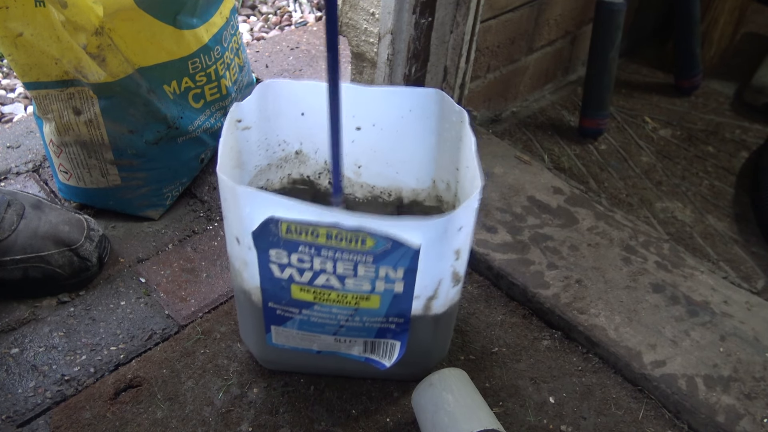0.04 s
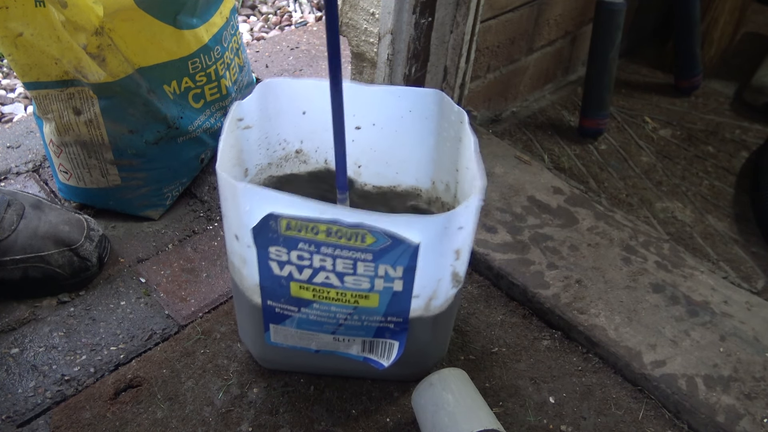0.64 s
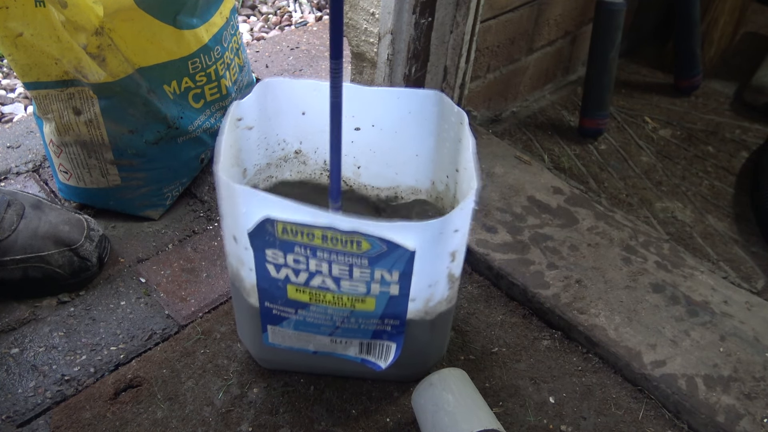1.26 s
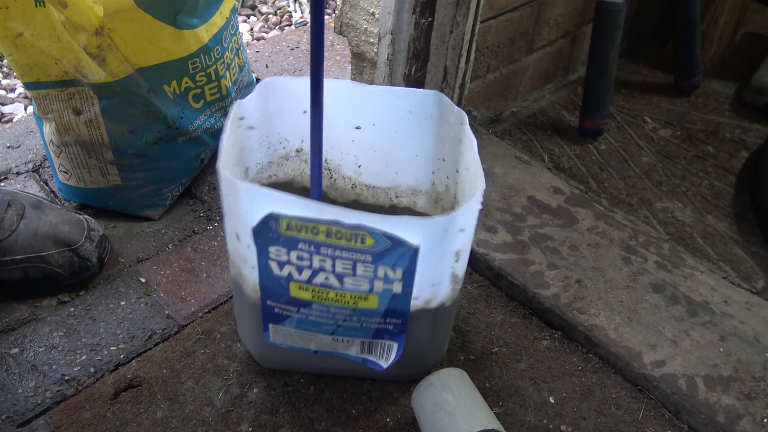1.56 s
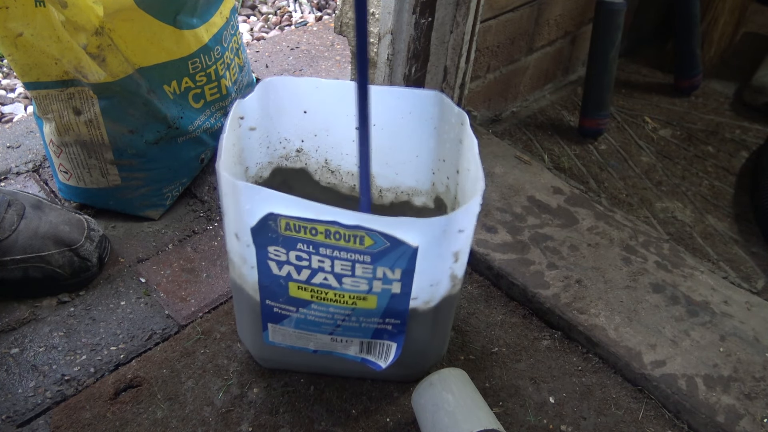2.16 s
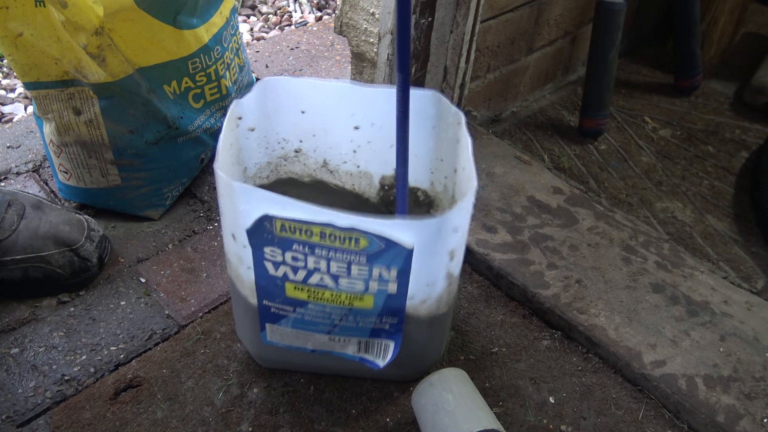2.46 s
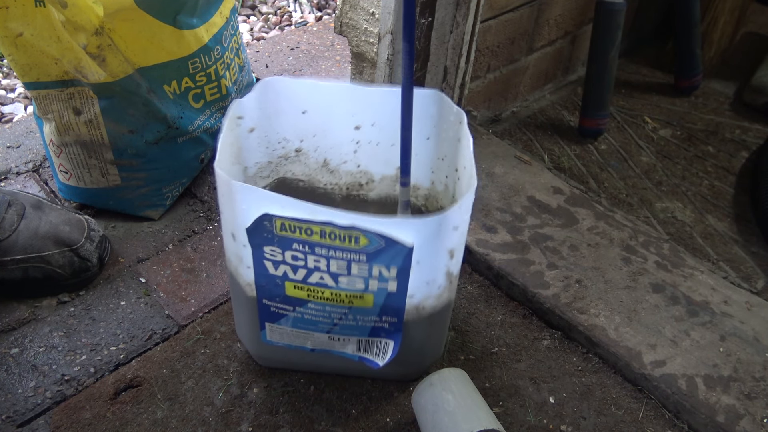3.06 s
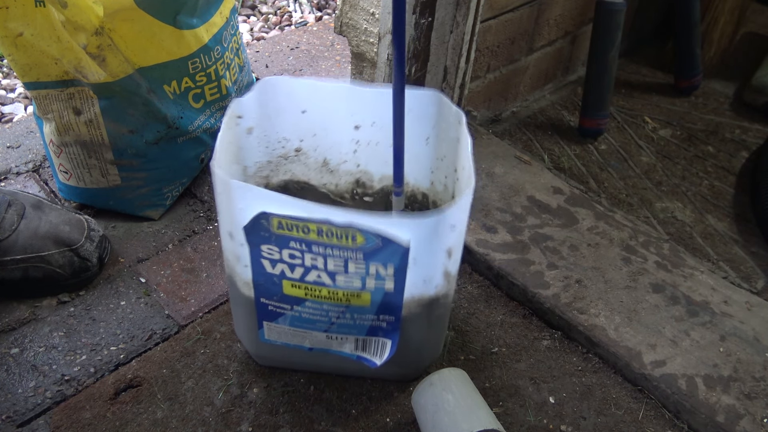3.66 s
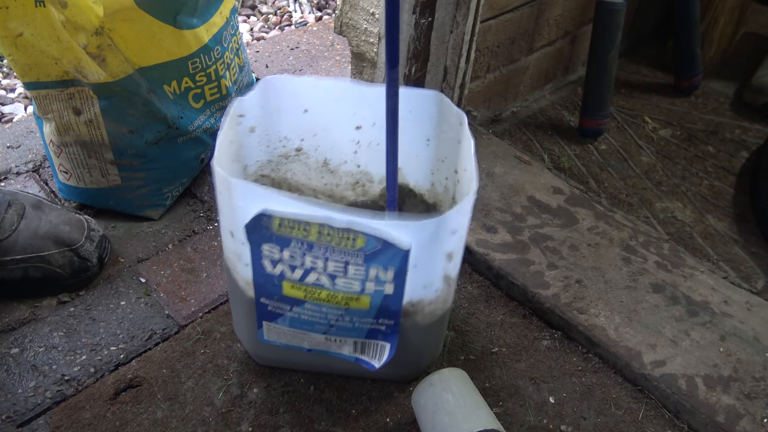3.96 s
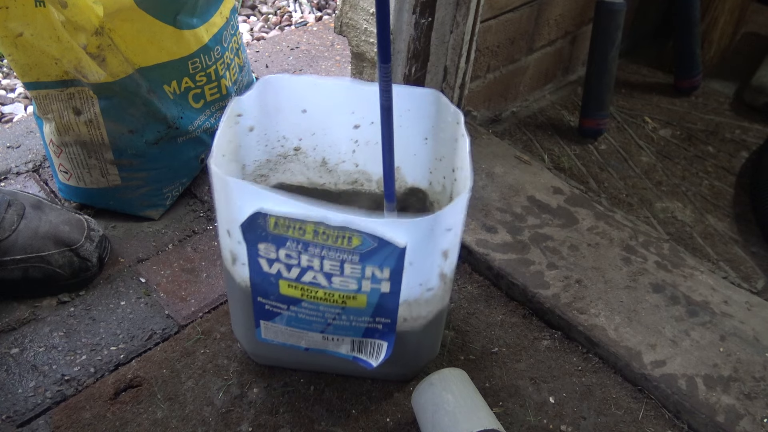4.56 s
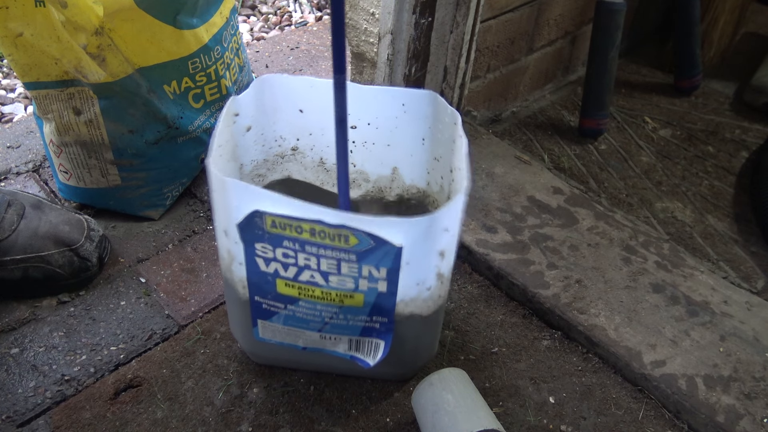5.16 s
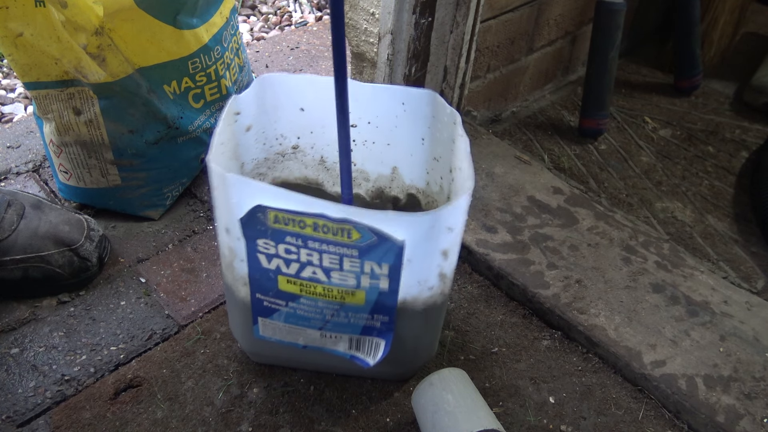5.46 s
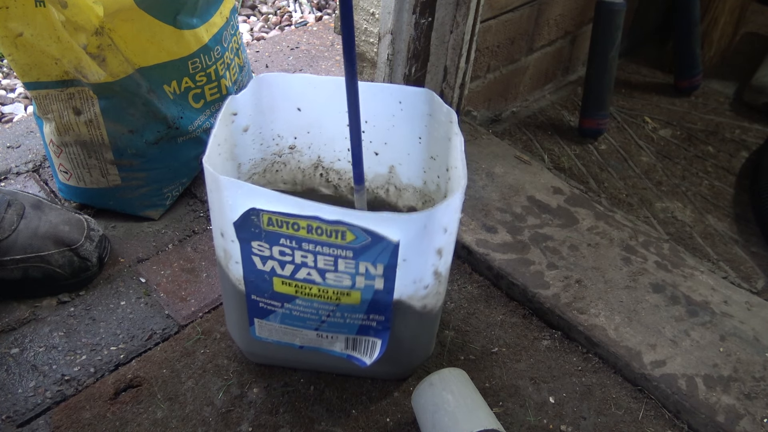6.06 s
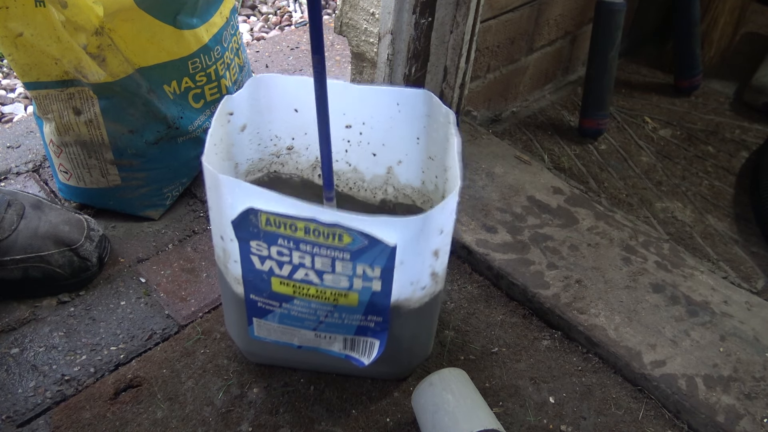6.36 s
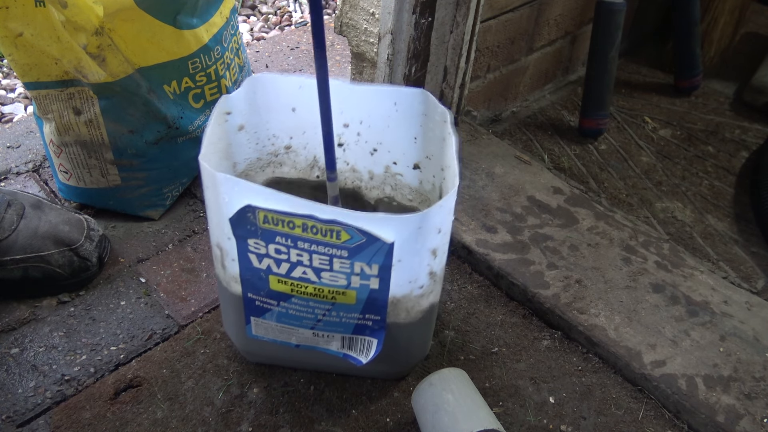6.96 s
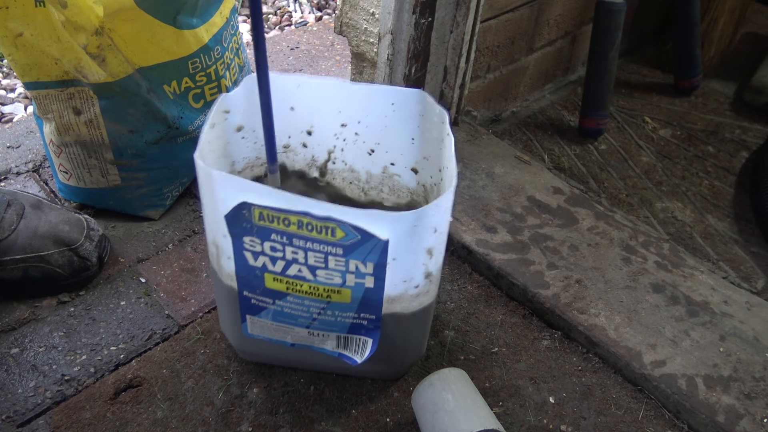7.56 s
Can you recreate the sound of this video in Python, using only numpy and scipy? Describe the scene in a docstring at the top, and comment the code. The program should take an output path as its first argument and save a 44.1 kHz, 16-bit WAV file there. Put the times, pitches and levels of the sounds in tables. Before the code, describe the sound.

An electric drill runs close by for the whole eight seconds or so, with a high, nearly constant motor and gear whine over the hiss of its fan. Its paddle churns wet cement in a plastic tub, making a rapid, hollow gurgle with grinding sand. In the first 1.5 seconds the mix splashes, fizzes and slaps, and the paddle scrapes and knocks on the plastic, most clearly near 0.4 and 1 second. More scrapes and knocks come around 2.9 seconds and from 3.7 to 4 seconds, among wet plops. From 4 to 6 seconds the churning is softer, with light grazes and small gritty crunches. The gear whine weakens and flutters after about 6 seconds, while lumps slap more strongly around 6.4 to 6.9 and again near 7.3 seconds. The drill is still running at the end. There is very little echo.

```python
"""A whining electric drill churns wet cement with a paddle, in a plastic tub in a doorway.
Motor tones and gear whine ride on the rush of the cooling fan. The blades pass about 22 times a second,
tearing open air pockets that ring the tub's hollow near 530 Hz. Sand grinds along the walls, lumps slap,
water splashes, and the paddle scrapes and knocks on the plastic."""
import sys
import numpy as np
from scipy import signal
from scipy.fft import rfft, irfft
from scipy.io import wavfile
from scipy.ndimage import uniform_filter1d

SR = 44100
rng = np.random.default_rng(int(sys.argv[2]) if len(sys.argv) > 2 else 0)


def pcm_store(signal):
    """Save signal as 16-bit PCM."""
    levels = np.round(np.clip(np.atleast_2d(signal), -1, 1) * 32767)
    wavfile.write(sys.argv[1], SR, levels.astype(np.int16).T)


N = 344862
T = np.arange(N) / SR
BINS_HZ = np.maximum(np.fft.rfftfreq(N, 1 / SR), 1)
MIC_LAG_MS = 0.04

# biggest lumps thrown: t/s, level/dB, air pocket f/Hz
BIG_LUMPS = [(.13, -15, 504), (.217, -14.5, 570), (.423, -9.5, 533), (.631, -13, 648), (.721, -15, 625),
             (.776, -13, 655), (.799, -7.5, 597), (1.276, -11.5, 652), (1.314, -12.5, 550),
             (1.374, -14, 484), (1.43, -13, 607), (1.654, -15.5, 495), (1.838, -13.5, 568),
             (1.932, -15, 626), (1.979, -13, 543), (2.117, -14.5, 553), (2.296, -19, 586),
             (2.466, -18.5, 530), (2.514, -14.5, 532), (2.625, -15.5, 595), (2.65, -15, 514),
             (2.74, -17.5, 513), (2.968, -13.5, 465), (3.019, -16, 495), (3.063, -19, 540),
             (3.282, -19, 511), (3.327, -14.5, 524), (3.365, -13.5, 524), (3.469, -12, 563),
             (3.541, -15, 560), (3.577, -14, 570), (3.618, -13.5, 586), (3.655, -10, 608),
             (3.711, -12.5, 562), (3.761, -10, 510), (3.795, -14.5, 495), (3.882, -14, 557),
             (3.899, -9.5, 530), (3.937, -11, 473), (4.069, -18.5, 550), (4.1, -15, 543), (4.135, -21, 540),
             (4.227, -19, 530), (4.311, -22, 545), (4.536, -20, 533), (4.911, -20.5, 533),
             (5.087, -18, 595), (5.179, -17, 517), (5.228, -13.5, 554), (5.273, -19.5, 552),
             (5.409, -17.5, 536), (5.548, -20, 516), (5.846, -14, 538), (5.892, -16, 570),
             (6.082, -19, 550), (6.35, -8, 560), (6.37, -14, 523), (6.447, -16.5, 632), (6.5, -16, 624),
             (6.54, -11.5, 510), (6.632, -12.5, 529), (6.649, -11, 585), (6.674, -12.5, 525),
             (6.72, -11.5, 557), (6.738, -16.5, 560), (6.813, -14.5, 495), (6.833, -20, 587),
             (6.88, -17.5, 525), (7.05, -22.5, 538), (7.226, -17, 518), (7.29, -12.5, 497), (7.32, -9, 517),
             (7.364, -14, 524), (7.534, -14.5, 564), (7.633, -12.5, 551), (7.676, -14, 586)]
# balance of the gear whine: t/s, left minus right/dB
WHINE_BALANCE = [(0, 0), (1.1, 0.5), (1.4, -2), (1.75, -0.5), (3.33, -6.5), (4.22, -3.5), (5.2, -1),
                 (6, -0.5), (6.5, 2), (7.27, 0.5), (7.82, 4)]


def from_db(db):
    """Decibels to gain."""
    return 10 ** (np.asarray(db) / 20)


def rms_one(x):
    """Scale to rms 1."""
    return x / np.sqrt(np.mean(x ** 2) + 1e-20)


def in_time(rows):
    """Rows (t/s, value) to one value per sample."""
    return np.interp(T, *np.transpose(rows))


def over_bins(rows):
    """Rows (f/Hz, value) to one value per FFT bin."""
    hz, value = np.transpose(rows)
    return np.interp(np.log(BINS_HZ), np.log(hz), value)


def swells(rows, roundness=0.48):
    """Rows (centre/s, length/s, level/dB) to a gain of rounded half-sine arches."""
    gain = np.zeros(N)
    for s, length, db in rows:
        arch = np.cos(np.pi * np.clip((T - s) / length, -1, 1))
        gain += from_db(db) * np.clip(arch, 0, 1) ** roundness
    return gain


def drift(rate_hz):
    """Slow random wander, rms 1."""
    hop = 40
    r = np.exp(-2 * np.pi * hop * rate_hz / SR)
    slow = signal.lfilter([1], [1, -2 * r, r * r], rng.standard_normal(N // hop + 2002))[2000:]
    return np.interp(np.arange(N) / hop, np.arange(len(slow)), rms_one(slow))


def resonate(x, hz, width_hz):
    """One resonance, peak gain 1."""
    r = np.exp(-np.pi * width_hz / SR)
    poles = [1, -2 * r * np.cos(2 * np.pi * hz / SR), r * r]
    return signal.lfilter(np.array([1, 0, -1]) * (1 - r * r) / 2, poles, x + 1e-18)


def band(x, low_hz, high_hz, order=2, kind="bandpass"):
    """Butterworth band filter."""
    return signal.sosfilt(signal.butter(order, [low_hz, high_hz], kind, fs=SR, output="sos"), x)


def grains(per_s, spread_db):
    """Random clicks of uneven size."""
    born = rng.random(N) < per_s / SR
    return born * from_db(spread_db * np.clip(rng.standard_normal(N), -2, 2)) * rng.choice([-1, 1], N)


def body(clicks, modes):
    """Each click strikes each mode with a random strength."""
    return sum(from_db(db) * resonate(clicks * rng.standard_normal(N), hz, width_hz)
               for hz, width_hz, db in modes)


def evened(x, window_s):
    """Unit level over the window; faster bursts stay."""
    size = int(window_s * SR / 2)
    return x / np.sqrt(uniform_filter1d(uniform_filter1d(x ** 2, size), size) + 1e-18)


def stereo(direct, scattered, coherence, colour_db=0):
    """Left and right at rms 1: scattered sound differs between them, and the left lags."""
    mid = rfft(direct) * np.sqrt((1 + coherence) / 2)
    side = rfft(scattered) * np.sqrt((1 - coherence) / 2)
    delay = np.exp(-2j * np.pi * BINS_HZ * MIC_LAG_MS / 1000)
    return rms_one(irfft(np.array([(mid + side) * delay, mid - side]) * from_db(colour_db), N))


def blows(rows, rise_s, noise_gain, noise_hz, glide, roundness=2):
    """Soft impacts from rows (t/s, level/dB, f/Hz): a rising ring plus noise swells and dies."""
    t = np.arange(SR // 8) / SR
    envelope = (t / rise_s * np.exp(1 - t / rise_s)) ** roundness
    out = np.zeros(N + len(t))
    for s, db, hz in rows:
        cycles = np.cumsum(hz * (1 + glide * np.tanh(t / rise_s - 1))) / SR
        ring = np.sqrt(2) * np.sin(2 * np.pi * (cycles + rng.random()))
        noise = rms_one(band(rng.standard_normal(len(t)), *noise_hz))
        at = max(int(s * SR), 0)
        out[at:at + len(t)] += from_db(db) * envelope * (ring + noise_gain * noise)
    return out[:N]


def rotor_tones(turns, tones, facing, lag_share=1.0, waver_db=1.24):
    """Harmonics of the rotor speed; reflections shift each one's level and phase between channels."""
    turns = turns + .0022 * drift(25)
    lag_turns = np.mean(np.diff(turns)) * SR * MIC_LAG_MS / 1000
    facing_db = in_time(facing) - 1.3
    out = np.zeros((2, N))
    for order, db in tones:
        lag_cycles = order * lag_turns * (lag_share + .08 * drift(.8))
        phase = 2 * np.pi * (order * turns + rng.random())
        level_db = db + facing_db + waver_db * drift(5)
        lean_db = -1.5 * drift(1.2)
        gain = from_db([level_db + lean_db, level_db - lean_db])
        out += gain * np.sin([phase - 2 * np.pi * lag_cycles, phase])
    return np.sqrt(2) * out


def motor(turns):
    """Commutator, brushes, fan blades and a thin metallic top sing on multiples of the rotor speed."""
    # tones of each part: rotor order, level/dB
    commutator_tones = [(9, -51), (11, -47), (12, -37), (14, -51), (19, -49), (21, -48), (22, -47),
                        (23, -50), (25, -53), (26, -51), (30, -45), (33, -55), (36, -49), (38, -52),
                        (40, -48), (41, -52)]
    brush_tones = [(24, -38.5), (28, -48.5)]
    fan_tones = [(15, -43)]
    top_tones = [(43, -47.5), (45, -56), (46, -60)]
    # their gains as the drill is turned: t/s, gain/dB
    commutator_gain = [(0, 2.5), (1.1, 0.5), (2.3, 0.5), (2.8, -1.5), (4.0, -5), (4.4, 2.5), (4.9, -2),
                       (5.3, 0.5), (6.3, 0), (6.8, -2), (7.3, -1), (7.82, 3)]
    brush_gain = [(0, 13), (.37, 0), (.6, 7), (1.7, -9), (2.45, 7), (2.85, 5), (3.1, -2), (3.7, 5),
                  (4.1, -2), (4.85, -2), (5.3, -2), (7.82, 4)]
    fan_gain = [(0, 6), (.22, 10), (.5, 0), (.83, 5.5), (2.1, 5), (2.85, -3), (3.05, -5), (4.1, -3),
                (4.5, 5), (4.8, 1), (5.05, 4), (6.3, 4), (6.7, -0.5), (7.82, 2)]
    top_gain = [(0, 12), (1.1, 10), (1.6, 3), (2.7, 4), (4, -9), (4.5, -1), (4.95, -10), (5.25, 4),
                (5.8, -2), (6.45, 7), (6.9, -1), (7.82, -2)]
    return (rotor_tones(turns, commutator_tones, commutator_gain)
            + rotor_tones(turns, brush_tones, brush_gain)
            + rotor_tones(turns, fan_tones, fan_gain, lag_share=0.35)
            + rotor_tones(turns, top_tones, top_gain, lag_share=0.51, waver_db=2.0))


def fan(turns):
    """Cooling air and brush hiss, chopped three times a turn, wavering as the drill moves."""
    # rush of air: t/s, level/dB
    rush = [(0, -24.5), (.35, -27.5), (.65, -25), (.9, -28), (2, -29), (2.6, -27), (3.1, -29), (3.6, -29),
            (4, -30.5), (4.8, -30.5), (5.3, -29), (6.3, -29), (7.2, -31), (7.5, -29.5), (7.7, -28),
            (7.82, -30.5)]
    # fan and brush spectrum: f/Hz, density/dB
    spectrum = [(30, -60), (100, -29), (300, -9), (880, -11), (1200, 4.5), (1600, -19), (2000, -5.5),
                (2700, -0.5), (3700, 4), (4500, -1.5), (7200, 2), (8100, -2.5), (10000, -7.5),
                (12000, -6.5), (14000, -10.5), (15600, -21)]
    # likeness of left and right: f/Hz, coherence
    coherence = [(30, 0.76), (400, 0.48), (2000, 1), (4000, 0.23), (7000, 1), (9000, 0.22), (12000, 0.89),
                 (15500, 0.13)]
    chop = 1 + 0.17 * np.sin(2 * np.pi * 3 * turns)
    waver = from_db(.55 * drift(12))
    air = rng.standard_normal((2, N)) * chop * waver
    return from_db(in_time(rush) + 3.5) * stereo(*air, over_bins(coherence), over_bins(spectrum))


def gearcase():
    """Tooth friction rings the gear housing near the mesh tone."""
    ring = resonate(rng.standard_normal((2, N)), hz=2420, width_hz=190)
    return stereo(*ring, coherence=.9)


def gears(turns, blade, mesh_per_turn=7.875, teeth=21):
    """The mesh tone wavers with its eccentric shaft and dips between blades; a faint whine stutters."""
    # gear whine: t/s, level/dB
    whine = [(0, -23), (.08, -34), (.13, -22), (.48, -21.5), (.53, -29), (.6, -21), (.7, -28), (.77, -22),
             (.95, -20), (1.08, -22.5), (1.22, -31), (1.29, -21), (1.7, -20.5), (2.05, -23.5),
             (2.38, -23.5), (2.42, -29), (2.48, -23.5), (2.75, -23.5), (3.2, -29), (4.66, -26.5),
             (4.85, -34), (5.2, -24.5), (5.45, -24.5), (5.54, -27), (5.62, -25.5), (5.77, -26),
             (5.95, -38.5), (6.3, -31), (6.75, -40.5), (7.08, -32.5), (7.82, -33)]
    # blade beat in the whine: t/s, level/dB
    throb = [(5.5, -42), (6.0, -28), (6.85, -26), (7.05, -37), (7.82, -39)]
    mesh_rad = 2 * np.pi * mesh_per_turn * turns
    runout = 1 + 0.026 * np.sin(mesh_rad / teeth)
    steady = from_db(in_time(whine) + drift(24)) * runout
    stroke = np.sqrt((1 + blade) / 2) - 2 / np.pi  # zero mean
    push = from_db(in_time(throb) + 4 * drift(8)) * stroke
    lag_rad = np.array([[.5], [0]])
    tone = np.sqrt(2) * (steady + push) * np.sin(mesh_rad + 0.37 * drift(35) - lag_rad)
    lean_db = in_time(WHINE_BALANCE)
    return tone * from_db([lean_db / 2, -lean_db / 2])


def slosh(rock_hz=6, depth_db=3):
    """Gain of the churning: the mix rocks unevenly and surges where the paddle digs into a thick part."""
    # steady churning: t/s, level/dB
    steady = [(0, -29), (1.6, -27), (2.3, -25.5), (2.7, -25), (3.15, -26.5), (4.1, -28), (4.5, -29.5),
              (5.5, -30), (6.2, -30.5), (7.02, -31.5), (7.82, -23)]
    # surges: centre/s, length/s, level/dB
    surges = [(.15, 0.49, -23), (.44, 0.038, -14), (.73, 0.61, -23), (1.1, 0.15, -20.5), (1.31, 0.18, -20),
              (1.48, 0.24, -24), (1.93, 0.25, -29), (2.92, 0.17, -28), (3.39, 0.24, -25.5),
              (3.6, 0.26, -26), (4.09, 0.084, -34), (5.22, 0.15, -26), (5.89, 0.21, -25.5),
              (6.46, 0.25, -21.5), (6.66, 0.11, -18.5), (6.735, 0.094, -27), (6.84, 0.16, -26),
              (7.31, 0.32, -25), (7.64, 0.15, -38)]
    rocking = np.sin(2 * np.pi * (rock_hz * T + rng.random() + 0.7 * drift(1.33)))
    return np.hypot(from_db(in_time(steady) + depth_db * rocking), swells(surges))


def churn(blade, stroke_db=-1.0):
    """Air pockets torn open by the blades pop and ring the hollow of the tub."""
    # air modes above the mix: f/Hz, width/Hz, level/dB
    hollow_modes = [(378, 29, -34), (487.8, 16.8, 4), (535.5, 22, 5.5), (609, 110, -2.5), (720, 14.7, -1)]
    pops = body(grains(per_s=430, spread_db=4.5), hollow_modes)
    hollow = band(band(pops, 400, 800), 380, 830)
    return rms_one(evened(hollow, window_s=0.11) * from_db(stroke_db * blade))


def rubbing(blade, modes, stroke_db=5.0):
    """Each blade drags gritty paste along the wall in one short rasp."""
    slips = grains(per_s=1600, spread_db=1.5) * from_db(stroke_db * blade)
    return evened(band(band(body(slips, modes), 337, 1680), 337, 1680), window_s=0.02)


def flexing(blade):
    """The heavy mix shoves the sides of the tub."""
    # modes of the loaded tub: f/Hz, width/Hz, level/dB
    flex_modes = [(91, 24, -29), (182, 16, 2), (241.5, 22, 8), (290, 107, 6.5)]
    # steady flexing: t/s, level/dB
    steady = [(0, -50), (2.7, -49), (3.3, -50.5), (4.05, -59), (4.5, -58), (4.85, -54), (5.5, -49),
              (6.2, -50), (6.5, -59), (6.7, -50), (7.82, -48.5)]
    # sideways shoves: centre/s, length/s, level/dB
    shoves = [(.2, 0.31, -45), (.44, 0.13, -29), (.87, 0.24, -41), (1.08, 0.14, -38), (1.68, .12, -42),
              (2.27, 0.33, -44), (2.9, 0.17, -41), (3.6, 0.14, -38), (3.83, 0.24, -39.5)]
    gain = from_db(-2) * np.hypot(from_db(in_time(steady)), swells(shoves))
    pushes = grains(per_s=500, spread_db=-3.5) * from_db(0.5 * blade)
    return gain * evened(band(body(pushes, flex_modes), 86, 335), window_s=0.46)


def walls(blade, sand_db):
    """The plastic rings as coarse grains patter on it, the mix flexes it and the paddle rubs it."""
    # wall modes, free and pressed by the paddle: f/Hz, width/Hz, level/dB
    free_modes = [(1030, 70, -12), (1168, 122, -4), (1452, 120, -6.5)]
    pressed_modes = [(386, 13, 6), (500, 114, 3.5), (968, 32, 0), (1187, 160, -2), (1440, 40, 1)]
    # light grazes and hard scrapes: centre/s, length/s, level/dB
    grazes = [(2.507, 0.015, -20.5), (2.794, 0.014, -24), (3.255, .02, -28.5), (4.11, 0.12, -32),
              (4.67, 0.12, -28), (4.79, 0.018, -28), (4.843, .016, -29), (4.89, .02, -30), (4.94, .02, -27),
              (4.985, 0.016, -25), (5.044, 0.019, -27), (5.716, 0.028, -26), (6.032, .018, -27),
              (6.22, 0.26, -33.5)]
    scrapes = [(.06, 0.67, -30), (.43, 0.096, -18.5), (.78, 0.28, -35.5), (2.875, 0.064, -21),
               (2.937, 0.056, -23.5), (2.975, 0.031, -23), (3.35, 0.86, -32.5), (3.715, 0.028, -25),
               (3.762, 0.025, -19), (3.808, 0.03, -20.5), (3.856, 0.049, -21.5), (3.895, 0.045, -21.5),
               (3.941, 0.049, -20.5), (3.979, 0.029, -20.5)]
    hits = grains(per_s=2500, spread_db=-0.5) * from_db(0.5 * blade)
    patter_db = -33 + 0.77 * (sand_db - sand_db.mean())
    patter = from_db(patter_db) * evened(band(body(hits, free_modes), 980, 1432), window_s=0.22)
    flex = flexing(blade)
    rub = np.hypot(from_db(sand_db - 6.5), swells(grazes)) * rubbing(blade, free_modes)
    scrape = swells(scrapes) * rubbing(blade, pressed_modes)
    return patter + flex + rub + scrape


def tub_notch(x, gap_hz=(754, 977)):
    """The open tub cancels the band between its hollow and its walls by a changing amount."""
    # gain in the gap: t/s, gain/dB
    gap_gain = [(0, -0.5), (1.5, -2.5), (2.3, -7), (2.55, 3), (2.9, -4), (3.25, -10), (3.65, -2.5),
                (3.97, -2), (4.05, -9), (6.3, -8), (7.82, -7)]
    rest = band(x, *gap_hz, order=3, kind="bandstop")
    return rest + from_db(in_time(gap_gain)) * band(x, *gap_hz, order=3)


def sand(blade):
    """Sand crackles between paddle and plastic, a little harder under each blade."""
    # grinding spectrum: f/Hz, density/dB
    spectrum = [(40, -39), (200, -22.5), (500, -30), (800, 1.5), (1000, 2), (1300, -0.5), (1900, 3),
                (3000, -2), (4500, -9), (7000, -28), (10000, -28), (15000, -30)]
    grit = [grains(per_s=5000, spread_db=5.5) for _ in range(2)] * from_db(0.5 * blade + drift(23))
    return stereo(*grit, coherence=.88, colour_db=over_bins(spectrum))


def fizz(blade):
    """Thin water films burst as the blades fold the mix over."""
    # wet fizz: t/s, level/dB
    level = [(0, -27), (.68, -29.5), (1.6, -31), (2.5, -32.5), (3.0, -34), (3.6, -33), (4.0, -41),
             (5.6, -46), (7.82, -33)]
    # bursting films: f/Hz, density/dB
    spectrum = [(100, -45), (1500, -17), (5000, 3.5), (8000, 2.5), (10000, 1), (12000, 2.5), (15500, -5.5)]
    pops = [grains(per_s=3000, spread_db=6.0) for _ in range(2)] * from_db(blade + 1.8 * drift(14))
    return from_db(in_time(level) + 3) * stereo(*pops, coherence=.7, colour_db=over_bins(spectrum))


def doorway(x, t60_s=0.48, wet_db=-22):
    """Short scattered reflections, different left and right."""
    t = np.arange(SR // 4) / SR
    tail = rng.standard_normal((2, len(t))) * from_db(-60 * t / t60_s) * (t > .004)
    tail /= np.sqrt(np.sum(tail ** 2, axis=1, keepdims=True))
    return x + from_db(wet_db) * signal.fftconvolve(x, tail, axes=1)[:, :N]


def yard(level_db=-62):
    """Faint steady rumble."""
    # outdoor background: f/Hz, density/dB
    spectrum = [(20, -14), (45, -2), (85, 5.5), (120, -3), (180, 3.5), (400, -5), (2000, -42)]
    noise = rng.standard_normal((2, N))
    return from_db(level_db) * stereo(*noise, coherence=.85, colour_db=over_bins(spectrum))


def small_lumps(passes, churning, lead_s=0.01101, jitter_s=0.00596, spread_octaves=0.0905):
    """Each blade that throws no big lump throws a small one: rows (t/s, level/dB, f/Hz)."""
    at = np.searchsorted(passes, np.arange(int(passes[-1]) + 1))
    late, size, pitch = np.clip(rng.standard_normal((len(at), 3)), -2, 2).T
    start_s = np.minimum(T[at] - lead_s + jitter_s * late, T[-1])
    level_db = 20 * np.log10(churning[at]) + 3.5 + 2 * size
    pocket_hz = 545 * 2 ** (spread_octaves * pitch)
    to_big_s = np.abs(start_s[:, None] - np.array(BIG_LUMPS)[:, 0]).min(axis=1)
    return np.transpose([start_s, level_db, pocket_hz])[to_big_s > .02]


def slaps(passes, churning, lead_s=0.00603, upper_hz=688.5):
    """Wet lumps land and ring their air pockets; big ones also ring the hollow's second note."""
    big = [(s - lead_s, db, hz) for s, db, hz in BIG_LUMPS]
    out = blows(big, rise_s=0.0099, noise_gain=0.22, noise_hz=(490, 760), glide=0.023, roundness=4.4)
    small = small_lumps(passes, churning)
    out += blows(small, rise_s=.015, noise_gain=0.27, noise_hz=(454, 690), glide=0.034, roundness=6)
    upper = [(s, db - 13, upper_hz) for s, db, _ in BIG_LUMPS]
    out += blows(upper, rise_s=0.0057, noise_gain=0.22, noise_hz=(620, 746), glide=0.01)
    return from_db(-6) * band(out, 334, 1090)


def knocks():
    """The paddle strikes the wall."""
    # strikes: t/s, level/dB, f/Hz
    strikes = [(.091, -11, 1120), (.269, -17, 1160), (.404, -10, 1160), (.428, -9, 1110), (.448, -14, 1030),
               (1.028, -4, 1176), (2.869, -18, 1050), (2.937, -12.5, 1215), (3.762, -16, 1270),
               (3.883, -12.5, 1094), (3.924, -9, 1330), (3.972, -24, 1300), (5.67, -14.5, 1140)]
    rings = blows(strikes, rise_s=0.0071, noise_gain=0.7, noise_hz=(930, 1620), glide=0.015)
    return from_db(-9) * band(rings, 830, 1600)


def thumps():
    """The tub heaves on the ground."""
    # heaves: t/s, level/dB, f/Hz
    heaves = [(.156, -35, 246), (.27, -34, 248), (.412, -29, 259), (.435, -35, 180), (.52, -35, 256),
              (.845, -36, 200), (1.025, -34, 177), (1.089, -33, 230), (1.657, -32, 234), (2.195, -42, 210),
              (3.045, -42, 171), (3.742, -29.5, 238), (6.632, -35, 332), (6.67, -36, 372)]
    return blows(heaves, rise_s=0.012, noise_gain=0.098, noise_hz=(150, 290), glide=0.052)


def spatter(decay_s=0.033):
    """Flung grains tick on the bare plastic above the mix, 10 ms each."""
    # ticks: t/s, level/dB
    ticks = [(0.164, -17), (0.7966, -22), (1.0705, -19), (1.151, -20), (1.4606, -16.5), (1.8407, -21),
             (2.2972, -22), (2.4583, -21), (2.7781, -22)]
    t = np.arange(SR // 100) / SR
    out = np.zeros((2, N))
    for s, db in ticks:
        at = int(s * SR)
        out[:, at:at + len(t)] += from_db(db - 3) * np.exp(-t / decay_s) * rng.standard_normal(len(t))
    return band(out, 3600, 10600)


def splashing():
    """Water flung up the wall: a cloud of small air pockets rings above the hollow's note."""
    # splashes: centre/s, length/s, level/dB
    splashes = [(.636, 0.021, -19), (.69, 0.11, -27), (.782, 0.032, -17), (.806, 0.02, -22),
                (1.285, 0.097, -23), (1.5, 0.085, -27), (1.88, 0.26, -37)]
    pockets = band(band(grains(per_s=2500, spread_db=3.0), 570, 840), 570, 840)
    return swells(splashes) * evened(pockets, window_s=0.03)


def crushing():
    """Coarse grit breaks between blade and wall in a dense rustle."""
    # crunches: centre/s, length/s, level/dB
    crunches = [(2.921, 0.0098, -21), (3.709, .016, -24), (3.795, 0.012, -30), (3.887, 0.02, -26),
                (3.931, .016, -28), (4.625, 0.013, -22), (4.66, 0.018, -31), (4.703, .016, -25),
                (4.753, 0.013, -22), (4.89, 0.014, -30), (5.085, .014, -27), (5.676, .012, -27),
                (5.765, .012, -31)]
    cracks = band(grains(per_s=4000, spread_db=-4.0), 1300, 3800)
    return swells(crunches) * evened(cracks, window_s=0.031)


def scene(turns_per_blade=14.228):
    """One shaft drives the motor tones, the gear whine and the beat of the blades."""
    # rotor speed under changing load: t/s, f/Hz
    rotor_speed = [(0, 311.9), (.35, 313), (1.0, 313), (1.35, 311.6), (1.83, 313.3), (2.16, 311.4),
                   (3.1, 310.3), (3.83, 310.1), (4.3, 311.8), (4.8, 312.5), (5.05, 311.3), (5.32, 311.9),
                   (5.55, 310.4), (5.82, 312), (6.16, 311.9), (6.48, 313.5), (6.85, 311.7), (7.82, 310.4)]
    # grinding, easing as the mix gets smoother: t/s, level/dB
    grinding = [(0, -23.5), (.35, -26.5), (.68, -26), (1.55, -27.5), (2.9, -29.5), (3.25, -32.5),
                (3.85, -29), (4.1, -34.5), (4.7, -33), (5.75, -32.5), (6.8, -36.5), (7.82, -35.5)]
    turns = np.cumsum(in_time(rotor_speed)) / SR
    passes = turns / turns_per_blade - .3  # first push at 0.3 blade periods
    blade = np.cos(2 * np.pi * passes)
    sand_db = in_time(grinding)
    churning = slosh()
    drill = motor(turns) + fan(turns) + from_db(sand_db - 4.5) * gearcase()
    tub = tub_notch(from_db(-4.2) * churning * churn(blade) + walls(blade, sand_db))
    tub += splashing() + slaps(passes, churning) + knocks() + thumps() + crushing()
    grit = from_db(sand_db + 1.5) * tub_notch(sand(blade)) + fizz(blade)
    lean_db = -.5 + 0.25 * in_time(WHINE_BALANCE)
    pan = from_db([lean_db / 2, -lean_db / 2])
    return (drill + grit) * pan + gears(turns, blade) + doorway(tub + spatter()) + yard()


def record(dry, low_hz=42, high_hz=15750):
    """Deep bass rolled off, top cut steeply."""
    thin = signal.sosfilt(signal.butter(2, low_hz, "high", fs=SR, output="sos"), dry)
    return signal.sosfilt(signal.ellip(12, .1, 80, high_hz, fs=SR, output="sos"), thin)


dry = scene()
out = record(dry)
pcm_store(out)
```